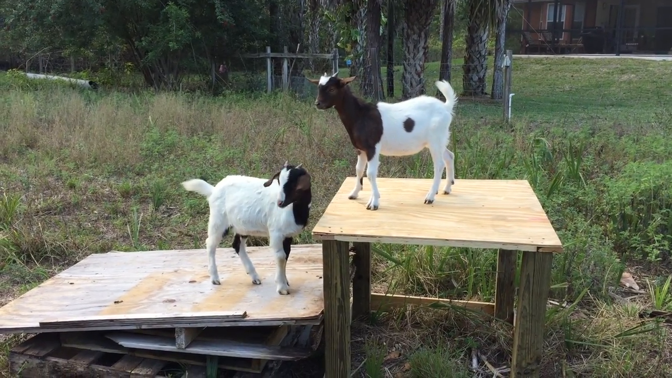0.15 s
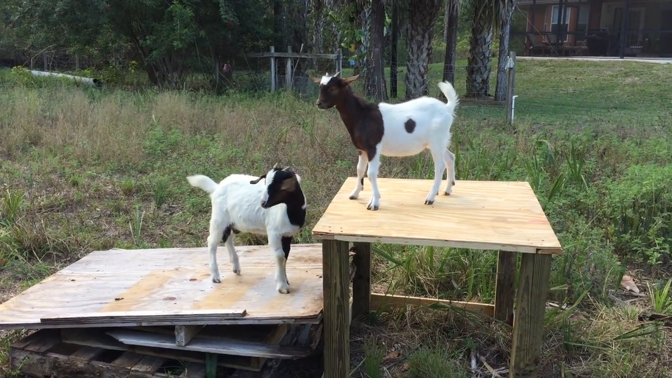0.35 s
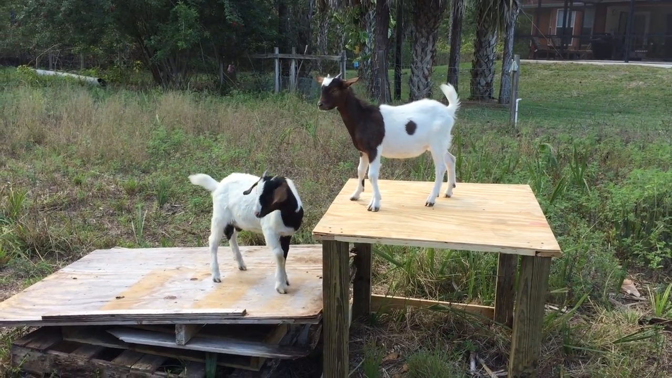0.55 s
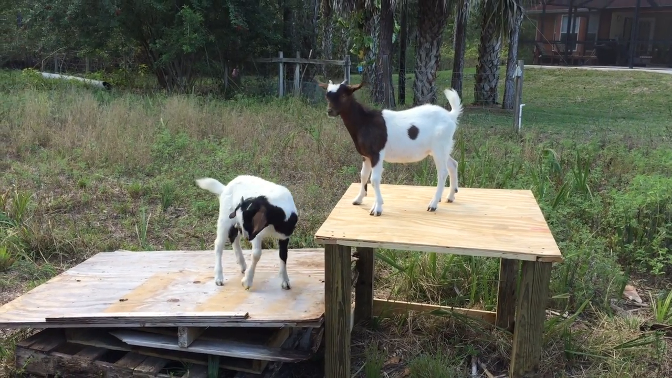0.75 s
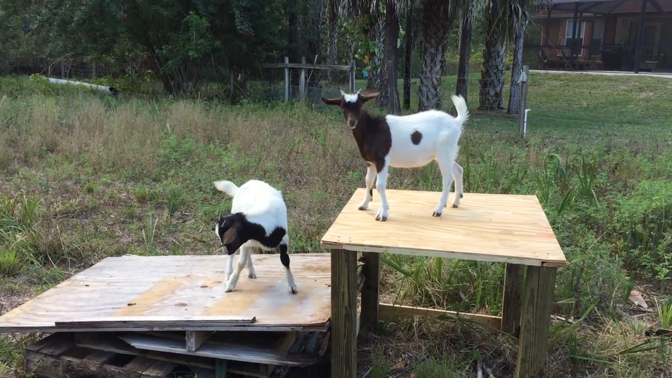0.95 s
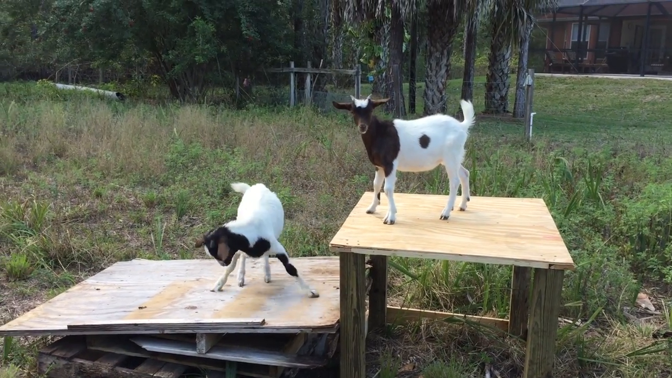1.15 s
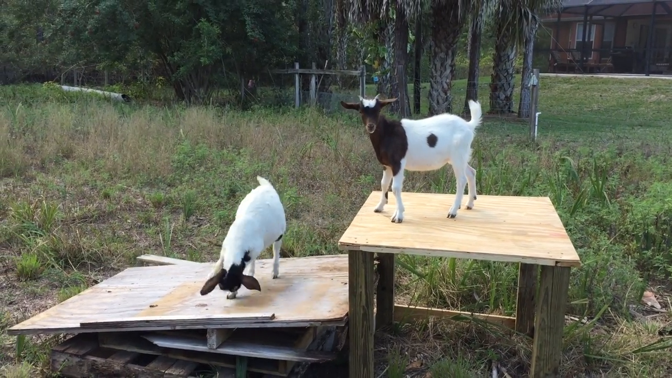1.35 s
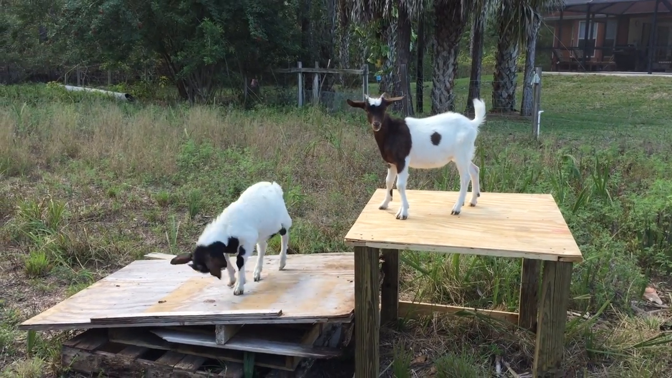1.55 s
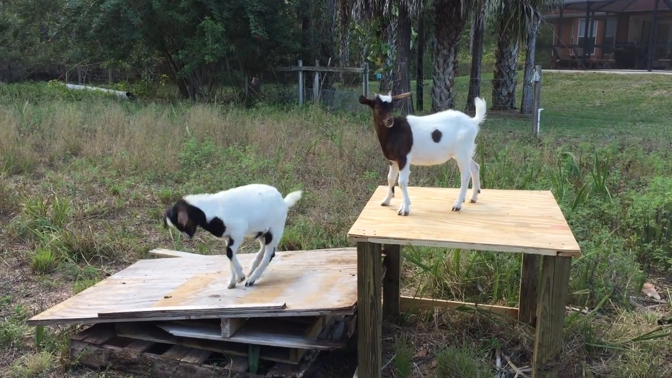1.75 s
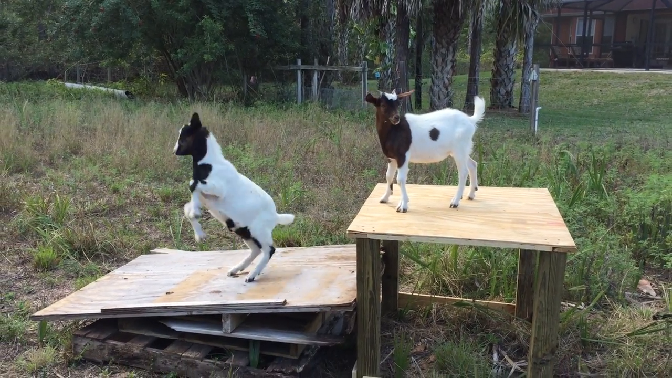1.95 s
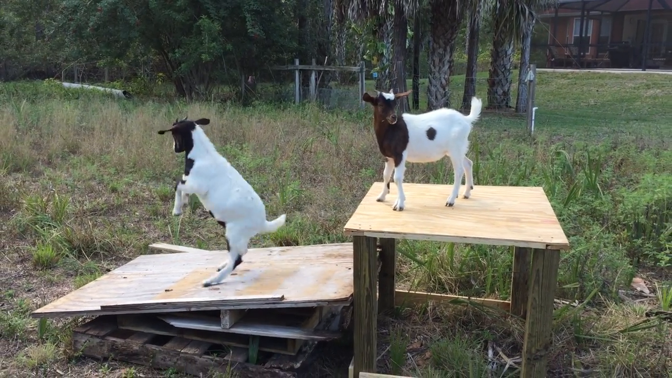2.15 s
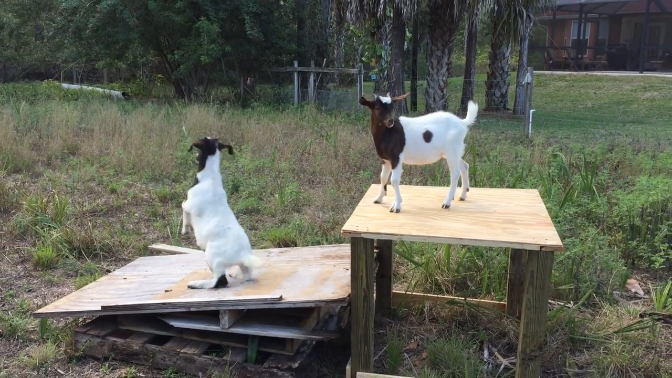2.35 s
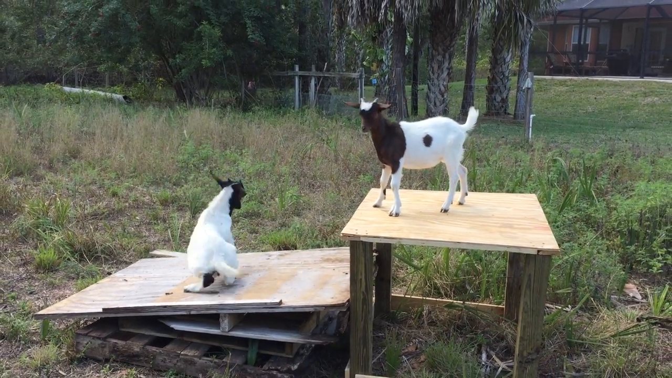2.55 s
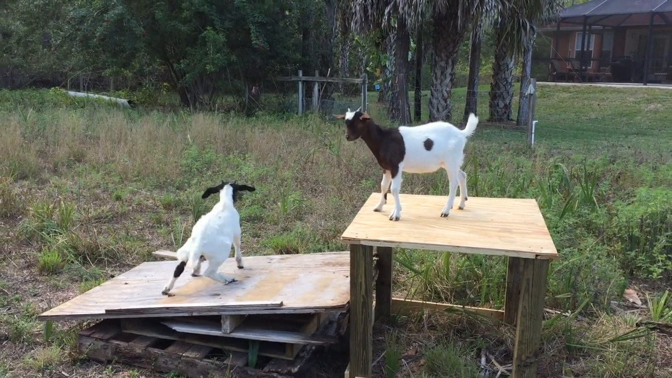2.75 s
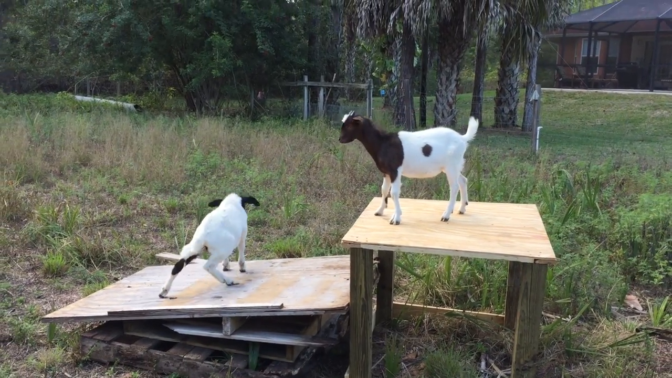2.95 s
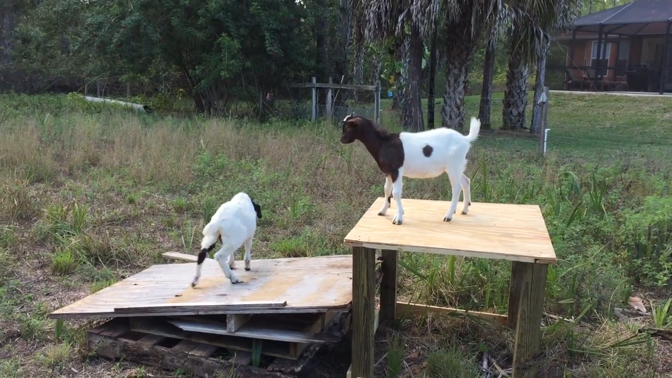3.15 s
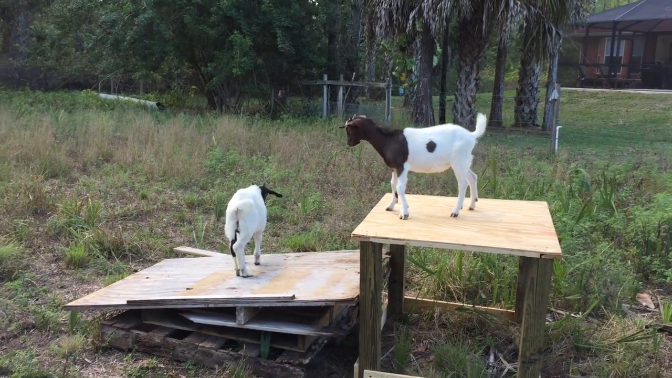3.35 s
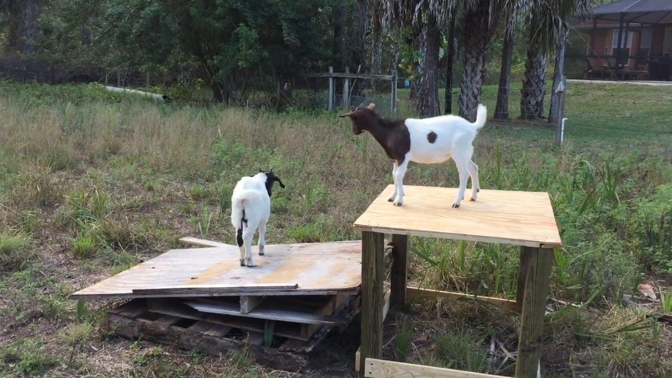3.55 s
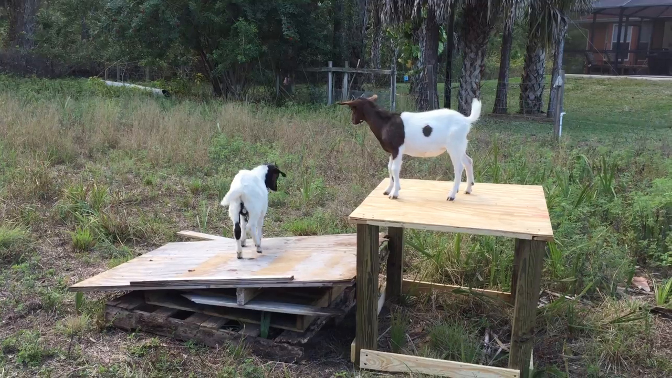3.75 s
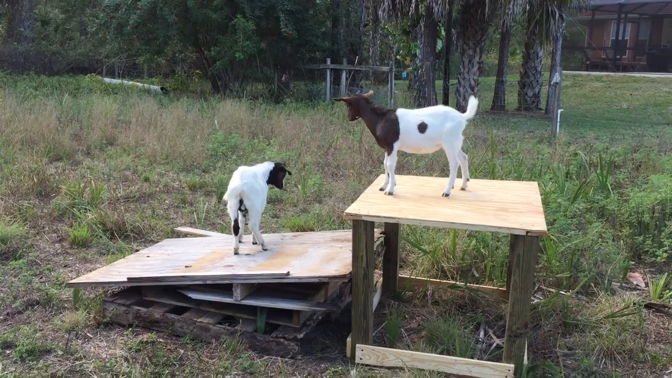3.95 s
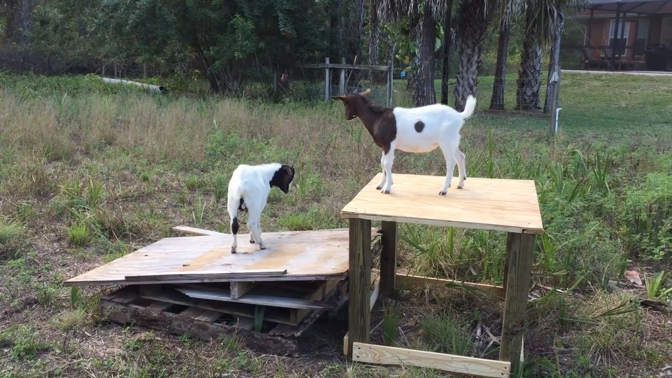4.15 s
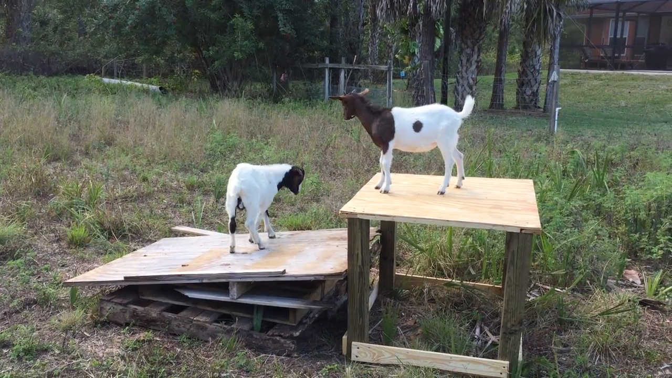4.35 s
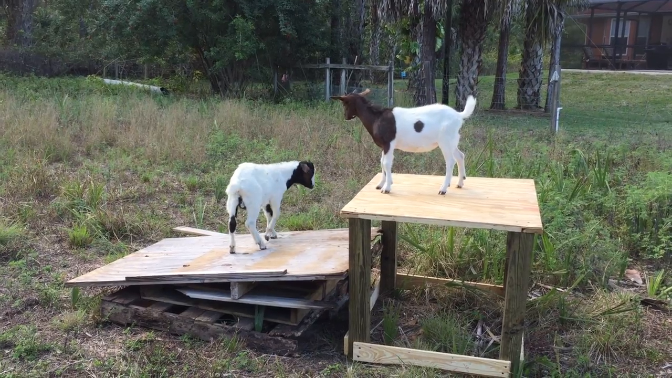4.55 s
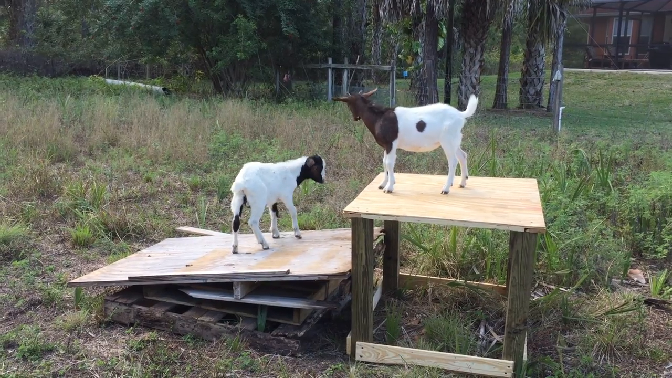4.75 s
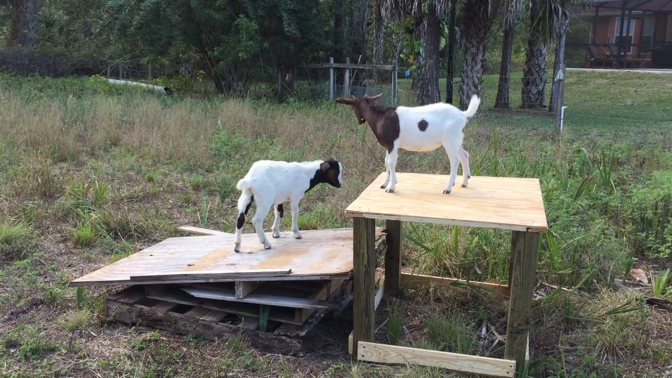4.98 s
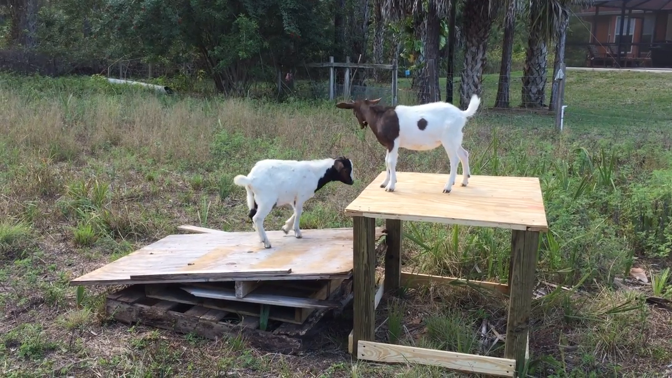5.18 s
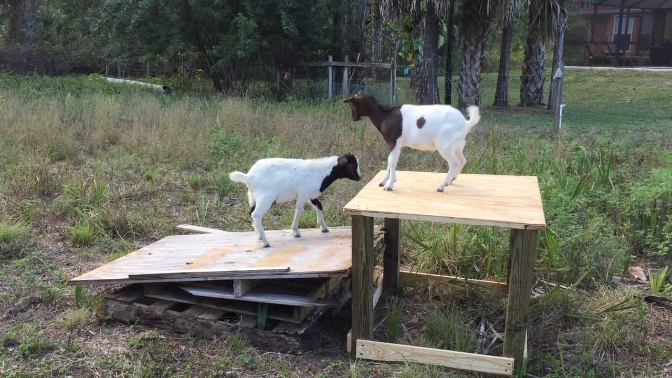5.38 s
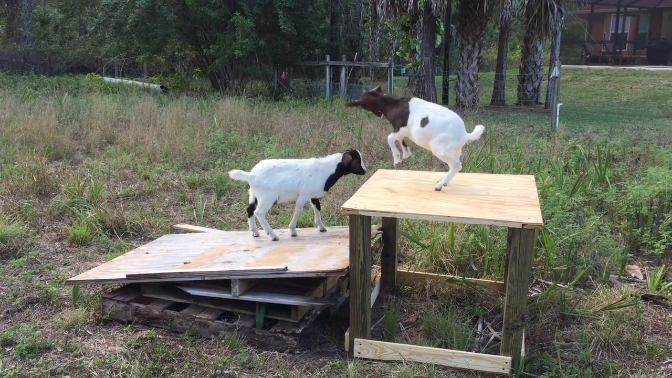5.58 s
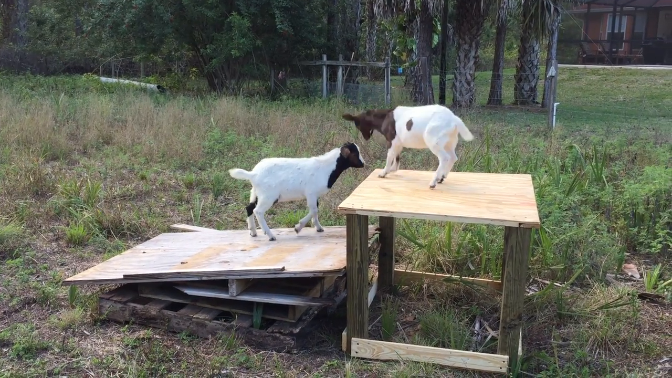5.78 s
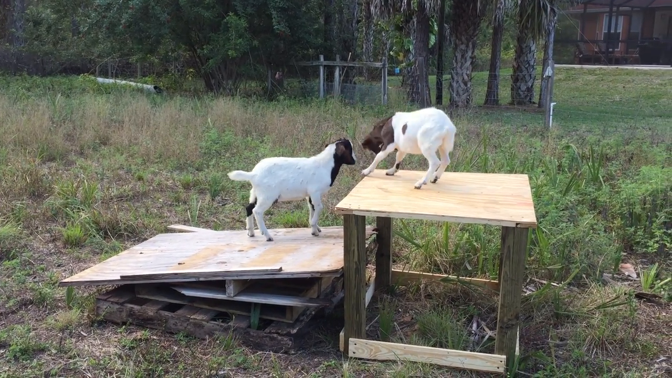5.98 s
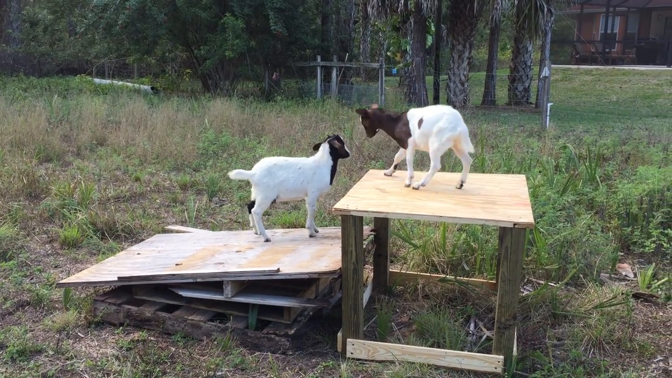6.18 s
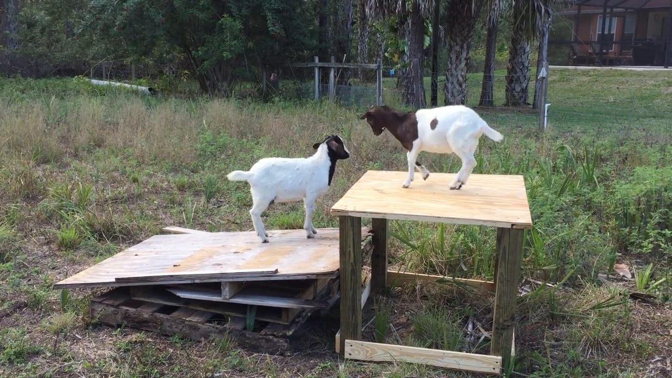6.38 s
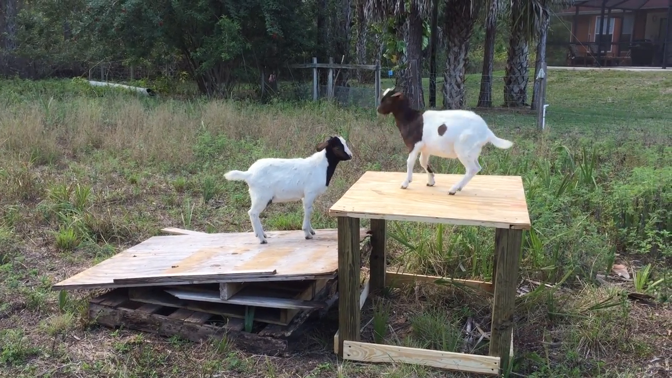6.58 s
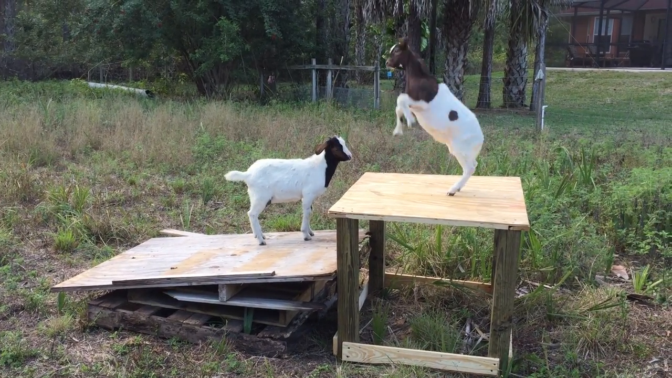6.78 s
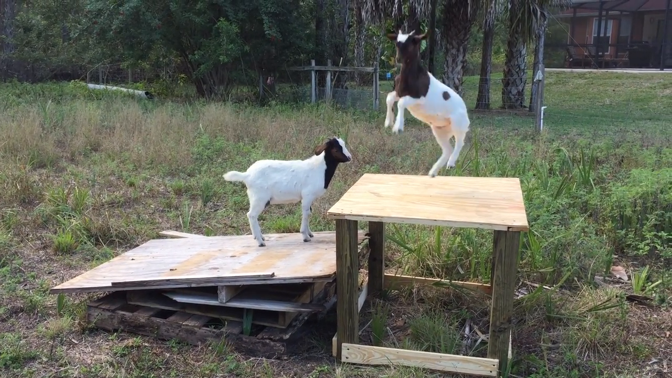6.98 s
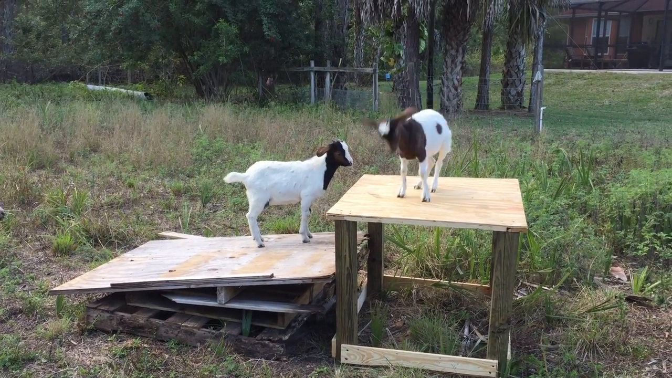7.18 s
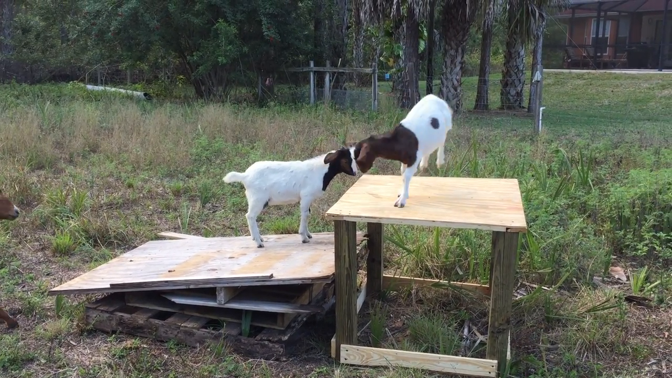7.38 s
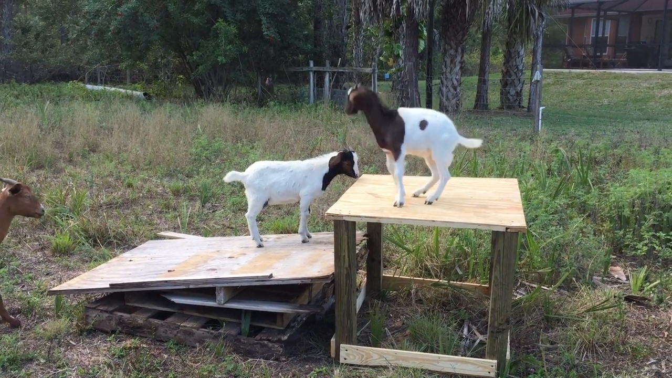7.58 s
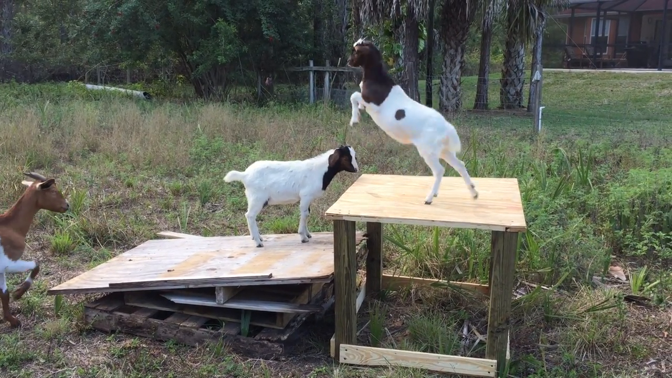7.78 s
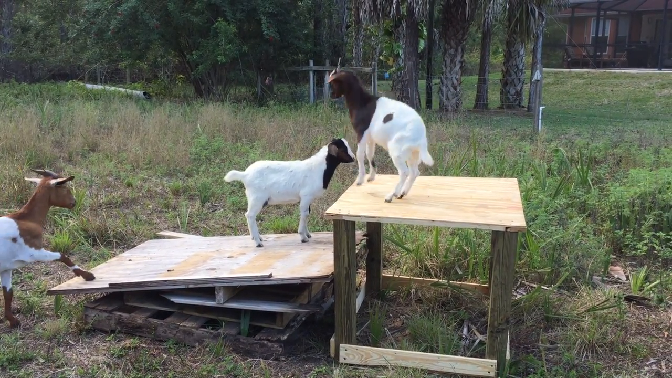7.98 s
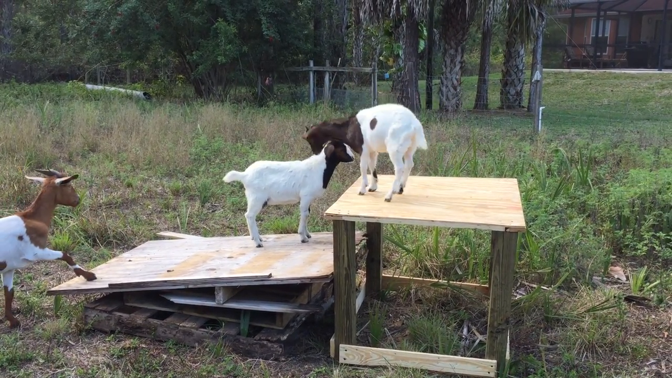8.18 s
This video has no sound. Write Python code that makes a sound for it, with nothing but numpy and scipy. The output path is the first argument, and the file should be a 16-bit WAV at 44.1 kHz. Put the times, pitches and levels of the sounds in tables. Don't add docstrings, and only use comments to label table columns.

```python
import sys
import numpy as np
from scipy import signal
from scipy.fft import rfft, irfft
from scipy.io import wavfile
from scipy.ndimage import uniform_filter1d

SR = 44100
rng = np.random.default_rng(int(sys.argv[2]) if len(sys.argv) > 2 else 0)


def volts(x):
    e = np.asarray(x, float) / 20
    return 10 ** e


def wav_record(signal):
    frames = np.transpose(np.atleast_2d(signal))
    bounded = np.clip(frames, -1, 1)
    quanta = np.round(bounded * 32767).astype(np.int16)
    wavfile.write(sys.argv[1], SR, quanta)


N = 362943


def unit(x):
    return x / np.sqrt(np.mean(x ** 2) + 1e-20)


def noise():
    return rng.standard_normal(N)


def at_hz(points, hz):
    points = np.array(points)
    return np.interp(np.log(hz), np.log(points[:, 0]), points[:, 1])


def drift(rate_hz):
    r = np.exp(-80 * np.pi * rate_hz / SR)
    slow = signal.lfilter([1], [1, -2 * r, r * r], rng.standard_normal(N // 40 + 2002))[2000:]
    return np.interp(np.arange(N) / 40, np.arange(len(slow)), unit(slow))


def resonate(x, hz, width_hz):
    r = np.exp(-np.pi * width_hz / SR)
    poles = [1, -2 * r * np.cos(2 * np.pi * hz / SR), r * r]
    return signal.lfilter(np.array([1, 0, -1]) * (1 - r * r) / 2, poles, x)


def resonate_twice(x, hz, wide_hz, narrow_hz):
    return resonate(resonate(x, hz, wide_hz), hz, narrow_hz)


def band_pass(x, low_hz, high_hz):
    return signal.sosfilt(signal.butter(2, [low_hz, high_hz], "band", fs=SR, output="sos"), x)


def coloured(x, spectrum):
    hz = np.fft.rfftfreq(len(x), 1 / SR) + 1
    return irfft(rfft(x) * volts(at_hz(spectrum, hz)), len(x))


def die_away(x, t60_s):
    return signal.lfilter([1], [1, -volts(-60 / (t60_s * SR))], x + 1e-18)


# pitch_hz [Hz], level_db [dB]
YARD_COLOUR = [(76, -65), (130, -34.5), (215, -4), (490, -5.5), (1260, -8.5), (2600, -12.5), (4300, -14.5),
               (4850, -18), (6430, -16.5), (9430, -19.5), (10400, -23), (14700, -17), (15900, -48.5)]


def yard_hiss():
    return volts(-71) * unit(coloured(noise(), YARD_COLOUR))


def far_traffic():
    hum = resonate(resonate(noise(), 87.3, 27), 57, 65)
    return volts(-65.5) * unit(hum * volts(drift(1.6)))


def frame_shudder(load):
    shudder_s, shudder_hz, level_db = 0.26, 72.7, -17.5
    boom = resonate_twice(noise(), shudder_hz, 12, 50)
    r = np.exp(-1 / (shudder_s * SR))
    power = signal.lfilter([1 - r], [1, -r], band_pass(load, 100, 500) ** 2)
    return unit(boom) * volts(level_db) * np.sqrt(power)


# start_s [s], length_s [s], top_hz [Hz], level_db [dB]
CHIRPS = [
    (4.225, .092, 3600, -79),
    (5.065, .09, 3560, -74),
    (5.3, .022, 4300, -74),
    (5.372, .086, 3500, -74),
]


def bird():
    arch_per_s2, swell_db_per_s = 115, 130
    out = np.zeros(N)
    flutter = volts(2.5 * drift(50))
    for start_s, length_s, top_hz, level_db in CHIRPS:
        t = np.arange(-length_s / 2, length_s / 2, 1 / SR)
        hz = top_hz * (1 - arch_per_s2 * t ** 2)
        whistle = np.sin(2 * np.pi * np.cumsum(hz) / SR) * volts(level_db + swell_db_per_s * t)
        out[round(start_s * SR):][:len(t)] = whistle * signal.windows.tukey(len(t), .2)
    return out * flutter


# start_s [s], length_s [s], pitch_hz [Hz], level_db [dB], fade_db [dB]
GRUNTS = [
    (1.978, 0.257, 680, -49.5, 13),
    (6.343, 0.99, 200.2, -44.5, 38.5),
]
# pitch_hz [Hz], width_hz [Hz], level_db [dB]
THROATS = [
    [(652, 93, 6.5), (1105, 280, -0.5), (325, 460, -8), (1340, 100, -27)],
    [(615, 176, 7), (1090, 210, 1), (383, 64, 6), (826, 98, 4), (1420, 87, -26)],
]


def through_throat(source, throat):
    return unit(sum(volts(db) * resonate_twice(source, hz, width, width) for hz, width, db in throat))


def grunts():
    attack_s, hold_s, fade_s = 0.02, 0.052, 0.33
    out, t = 0, np.arange(N) / SR
    for (start_s, length_s, pitch_hz, level_db, fade_db), throat in zip(GRUNTS, THROATS):
        faded_s = np.maximum(t - start_s - attack_s - hold_s, 0)
        loss_db = fade_db * (1 - np.exp(-faded_s / fade_s))
        gate = np.clip(np.minimum(t - start_s, start_s + length_s - t) / attack_s, 0, 1)
        breath = np.clip(.27 + .019 * loss_db, .05, .9)
        onset_bend = 0.0487 * np.exp(-np.abs(t - start_s) / 0.0297)
        hz = pitch_hz * (1 + 0.0186 * drift(54) + 0.0081 * drift(6) + onset_bend)
        pulses = np.diff(np.floor(np.cumsum(hz) / SR), prepend=0) * volts(2 * drift(33))
        voiced = through_throat(pulses, throat)
        breathy = through_throat(noise(), throat[:2])
        voice = np.sqrt(1 - breath) * voiced + np.sqrt(breath) * breathy
        out = out + voice * volts(level_db - loss_db - 0.5 * drift(9.9)) * gate
    return out


# start_s [s], peak_db [dB]
GRIT_TICKS = [(0.36, -35.5), (0.744, -38.5), (2.1289, -34.5), (2.172, -40), (2.218, -27), (2.246, -31),
              (2.258, -17), (2.274, -37), (2.6194, -28), (2.668, -27), (3.5543, -42), (3.7208, -42),
              (4.865, -45), (5.373, -33), (5.4929, -28.5), (5.957, -25), (6.0228, -33), (6.503, -44),
              (7.7192, -33), (8.1715, -32.5)]


def grit_ticks():
    clicks = np.zeros(N)
    for start_s, peak_db in GRIT_TICKS:
        clicks[round(start_s * SR)] = volts(peak_db - 11.5)
    return die_away(clicks, 0.0068) * unit(band_pass(noise(), 2600, 12300))


# start_s [s], length_s
# [s], rasp_db [dB], hiss_db [dB over rasp], rumble_db [dB over rasp]
RAMP_SLIDES = [(0.347, 0.18, -52.5, -2, -4.5), (0.615, 0.083, -57, -7, -7), (0.694, 0.15, -72, 3.5, 2),
               (0.944, 0.18, -54, 2.5, -6.5), (1.083, 0.13, -45.5, -5, -3.5), (1.165, 0.31, -49.5, -2.5, 3),
               (1.348, 0.22, -47, -3.5, 3), (1.507, 0.26, -57, -0.5, 3), (1.887, 0.048, -46.5, -5.5, -3),
               (1.931, 0.057, -46, -7.5, 2), (1.96, 0.37, -72, 0, 13.5), (2.188, 0.12, -42, -2.5, -1),
               (2.26, 0.15, -48.5, -6.5, 1), (2.4, 0.18, -45, -4.5, 1.5), (2.63, 0.32, -45, -13.5, -5),
               (2.78, 0.43, -52, -9.5, 2), (3.025, 0.34, -61, -15, -9), (3.283, 0.1, -53.5, -4, -12),
               (3.595, 0.12, -68.5, -3.5, -6), (4.081, 0.1, -62, -9, -1), (4.602, 0.098, -68.5, -4, -3),
               (5.131, 0.1, -62, -5, -4), (5.44, 0.16, -55.5, -3.5, 7), (5.502, 0.26, -48, -5.5, -4.5)]
TABLE_SLIDES = [(5.83, 0.097, -67, 0, 9), (6.05, 0.12, -67.5, -3, 11), (6.391, 0.11, -58.5, -3.5, 5.5),
                (6.941, .09, -69.5, 5, 4.5), (7.31, 0.1, -54.5, -2, -6), (7.43, 0.067, -64, -3, 2),
                (7.829, 0.09, -55.5, -0.5, -4), (7.887, 0.057, -39, -2, -22),
                (7.945, 0.081, -44.5, -5.5, -16.5)]


def slide_strokes():
    peak_at, edge_db, squareness = 0.49, -17.5, 1.97
    power = np.zeros((4, N))
    for start_s, length_s, rasp_db, hiss_db, rumble_db in [*RAMP_SLIDES, *TABLE_SLIDES]:
        progress = np.arange(round(length_s * SR)) / (length_s * SR)
        off_peak = np.interp(progress, [0, peak_at, 1], [1, 0, 1])
        grit_db = -15.5 + 0.47 * hiss_db
        layers_db = rasp_db + np.array([rumble_db, 0, hiss_db, grit_db])
        force = volts(layers_db[:, None] + edge_db * off_peak ** squareness)
        power[:, round(start_s * SR):][:, :len(off_peak)] += force ** 2
    return np.sqrt(uniform_filter1d(power, size=600).clip(0))


# pitch_hz [Hz], level_db [dB per Hz]
SLIDE_COLOUR = [(65, -36), (110, -1), (150, 0.5), (189, -2.5), (360, -2.5), (462, -16.5), (556, -4),
                (685, -11.5), (1670, -7), (2820, -23.5), (5470, -21.5), (14200, -27.5), (15800, -29)]
BAND_EDGES = [50, 115, 575, 2500, 7000, 15500]


def slides():
    slips_per_s, snags_per_s, snag_gain = 2500, 70, 3.3
    out, clump = 0, drift(47)
    pitches = np.geomspace(125, 14800, 24)
    sizes = volts(3.0 * np.minimum(rng.exponential(1, N), 5))
    snags = sizes * (rng.random(N) < snags_per_s / SR)
    for g, force in enumerate(slide_strokes()):
        band = 0
        for hz in pitches[np.digitize(pitches, BAND_EDGES) == g + 2]:
            luck = rng.random(N) - .5
            slipping = 2 * np.abs(luck) < slips_per_s * (hz / 1000) ** .9 / SR
            clicks = sizes * np.sign(luck) * slipping + snag_gain * snags + 1e-18
            rings = unit(resonate_twice(clicks, hz, 0.36 * hz, 0.16 * hz))
            band = band + rings * volts(at_hz(SLIDE_COLOUR, hz) + 2.5 * drift(10.2)) * np.sqrt(hz)
        out = out + unit(band * volts(2.5 * clump)) * force
    return out


# [crack over knock, dB]
RAMP_STEPS = [(0.626, -45.5, 510, -9, -17), (0.935, -37.5, 254, -5, -15), (1.035, -43, 135, -3, -1),
              (1.131, -44, 527, -3, -6), (1.298, -40.5, 166, -8, -6), (1.474, -43, 280, -6, -1),
              (1.755, -32.5, 155.7, -6, -14.5), (2.183, -47, 203, 10.5, -13), (2.239, -34, 173, -21, 2.5),
              (2.259, -33, 350, -20, -5), (2.288, -33.5, 147.5, 1.5, -23), (2.499, -24, 511, -7.5, -7),
              (2.624, -20, 372, -5.5, -11), (2.669, -22.5, 267, -2, -6), (2.731, -30, 239, 6, -16),
              (2.747, -24.5, 188, -1, -26), (2.893, -29.5, 167.4, -8, -12), (3.079, -34, 277.5, 0.5, -24),
              (3.484, -37.5, 542, -9, -10), (4.094, -40, 549, -11, -9.5), (4.405, -44.5, 232.6, 4, -13),
              (4.91, -49.5, 493, -2.5, -16), (5.372, -35.5, 271, -9, -13), (5.496, -38, 414, -4, -28)]
# start_s [s], knock_db [peak dB], knock_hz [Hz], weight_db [dB], hardness_db [dB]
TABLE_STEPS = [(3.846, -60, 1120, -2.5, -4.5), (5.289, -64.5, 816, 3, -5), (5.863, -47.5, 520, -20, -9),
               (5.921, -27.5, 896, -4, -7.5), (5.958, -21, 788, -10, -7), (6.037, -28, 1500, -10.5, -3),
               (6.095, -45, 630, -18, -26), (6.31, -29, 1420, -7, -5), (6.62, -31, 1374, -8.5, -7.5),
               (6.647, -35, 700, -14, -17.5), (6.969, -57.5, 1240, 4.5, -31), (7.089, -38.5, 1400, -21, -3),
               (7.215, -25.5, 875, -4, -7), (7.245, -22, 633, -5.5, -9.5), (7.3, -20, 710, -6.5, -5.5),
               (7.525, -31, 1420, -8, -15), (7.707, -29.5, 654, 0, -15), (7.721, -32, 600, 2, -6.5),
               (8.076, -26.5, 662, -1, -12), (8.11, -27, 711, -6.5, -4), (8.137, -25.5, 535, -9, -14),
               (8.17, -20, 1426, -15, -5)]
# start_s [s], knock_db [peak dB], knock_hz [Hz]
CLACKS = [(1.01, -36, 1820), (1.506, -32, 1230), (1.547, -32, 1640), (2.152, -39.5, 650),
          (2.326, -31.5, 1580), (2.417, -39.5, 1730), (2.563, -27.5, 1655), (2.699, -27.5, 1600),
          (2.851, -27, 1696), (2.94, -35, 1645), (2.972, -36.5, 976), (3.223, -42, 866), (3.386, -54, 923),
          (3.541, -47, 690), (5.185, -50, 1180), (6.174, -49.5, 2060), (6.81, -54, 1370),
          (7.003, -50, 1280)]


def all_blows():
    blows = []
    for s, db, thud_hz, weight, hard in RAMP_STEPS:
        knock_hz = np.clip(677 * 2 ** (-0.14 * weight), 580, 1800)
        blows.append((s, db, knock_hz, weight, thud_hz, hard))
    blows += [(s, db, hz, weight, 281.5, hard) for s, db, hz, weight, hard in TABLE_STEPS]
    blows += [(s, db, hz, -16.5, 145, -24) for s, db, hz in CLACKS]
    return blows


# pitch_hz [Hz], t60_s [s]
WOOD_T60 = [(60, 0.41), (160, 0.26), (300, 0.11), (500, 0.11), (1000, 0.11), (2500, 0.073), (6000, 0.016),
            (14000, 0.061)]
# pitch_hz [Hz], level_db [dB per Hz]
WOOD_COLOUR = [(50, -18.5), (280, -8), (570, -12), (1300, -10.5), (2700, -18.5), (4000, -16), (5600, -12.5),
               (7200, -33.5), (10400, -43), (15800, -47.5)]


def plate_modes(hz, best_hz, size, phase, damped):
    hz[np.argmin(np.abs(hz - best_hz))] = best_hz
    near = np.exp(-(np.log(hz / best_hz) / .25) ** 2)
    t60 = at_hz(WOOD_T60, hz) * (1 - (.25 + .25 * near) * damped)
    t = np.arange(round(min(t60.max(), .3) * SR))[None] / SR
    age = np.maximum(t - 0.0028 * 300 / np.maximum(hz, 150), 0)
    cycles = age * hz
    swell = (1 - np.exp(-cycles / 0.2)) * np.exp(-np.log(1000) * age / t60)
    uneven_db = 6.5 * np.minimum(size, .7) * (hz != best_hz)
    favoured_db = 13 * near
    gain = volts(at_hz(WOOD_COLOUR, hz) + favoured_db + uneven_db) * np.sqrt(hz)
    wave = gain[:, 0] @ (swell * np.sin(2 * np.pi * cycles + 1.184 * phase))
    wave *= np.minimum(np.arange(len(wave))[::-1] / 800, 1)
    return wave / np.abs(wave).max()


def board_ring(blows):
    out = np.zeros(N + SR)
    ladder = np.geomspace(62, 2500, 64)
    group = np.digitize(ladder, BAND_EDGES) - 1
    for s, knock_db, knock_hz, weight, thud_hz, _ in blows:
        shift, size, phase = rng.standard_normal((3, 64, 1))
        hz = ladder[:, None] * (1 + 0.022 * shift)
        at, thud_db = round(s * SR), knock_db + weight
        parts = [(thud_db - 13.5, 70), (thud_db + 5.0, thud_hz), (knock_db - .2, knock_hz)]
        for g, (level_db, best_hz) in enumerate(parts):
            mine = group == g
            wave = plate_modes(hz[mine], best_hz, size[mine], phase[mine], g == 2)
            out[at:at + len(wave)] += volts(level_db) * wave
    return out[:N]


def contacts(blows):
    cracks, slaps = np.zeros((2, N))
    graze_db = -76.5
    for s, knock_db, _, _, _, hard in blows:
        at = round(s * SR)
        cracks[at - 15:at + 25] = volts(knock_db + hard - 25.5)
        cracks[at - 280:at - 15] = volts(knock_db + hard + graze_db)
        slaps[at - 220:at - 20] = volts(knock_db + graze_db + 10.5)
        slaps[at - 20:at + 20] = volts(knock_db - 7 + .4 * hard) / 40
    return cracks, slaps


def hoof_slap(slaps):
    return die_away(slaps, .022) * unit(band_pass(noise(), 1410, 2170))


def wood_crack(cracks):
    out = 0
    rattle = volts(-24) * die_away(cracks, 0.32)
    snap = 0.98 * die_away(cracks, 0.0089)
    edges = np.geomspace(2200, 15500, 9)
    for low, high in zip(edges, edges[1:]):
        mid = np.sqrt(low * high)
        dying = die_away(cracks, at_hz(WOOD_T60, mid))
        hiss = unit(band_pass(noise(), low, high)) * volts(0.5 * drift(2.1))
        level = volts(at_hz(WOOD_COLOUR, mid) - at_hz(WOOD_COLOUR, 4300) - 16.0) * np.sqrt(mid / 4000)
        out = out + (dying + rattle + snap) * hiss * level
    return out


def knocks():
    blows = all_blows()
    cracks, slaps = contacts(blows)
    return board_ring(blows) + hoof_slap(slaps) + wood_crack(cracks)


def echoes(x):
    out, dull = x.copy(), band_pass(x, 210, 2300)
    for delay_s, level_db in [(.031, -21.5), (.053, -24.5), (.087, -28.5)]:
        lag = round(delay_s * SR)
        out[lag:] += volts(level_db) * dull[:-lag]
    return out


def scene():
    blows, scrapes = knocks(), slides()
    background = yard_hiss() + far_traffic() + frame_shudder(blows + scrapes) + bird()
    return (background + echoes(blows + grunts()) + grit_ticks() + scrapes)[None]


def band_limit(x):
    return signal.sosfilt(signal.butter(12, 16380, fs=SR, output="sos"), x)


def record(dry):
    mix = signal.sosfilt(signal.butter(2, 45, "high", fs=SR, output="sos"), dry)
    mix = signal.sosfilt(signal.cheby2(12, 60, 16000, fs=SR, output="sos"), mix)
    return band_limit(mix)


dry = scene()
out = record(dry)
wav_record(out)
```